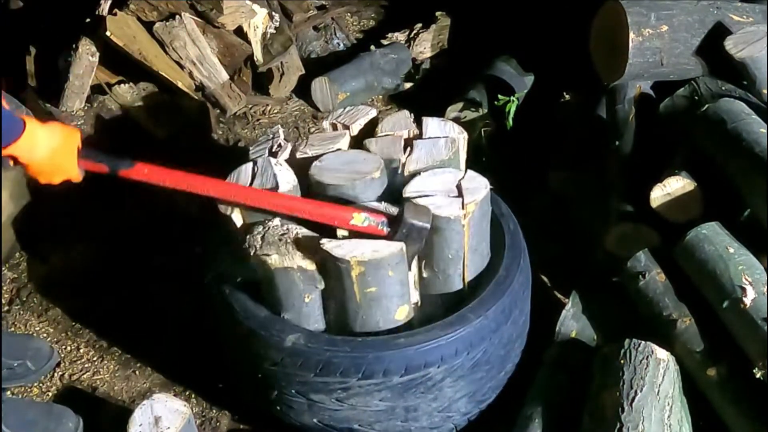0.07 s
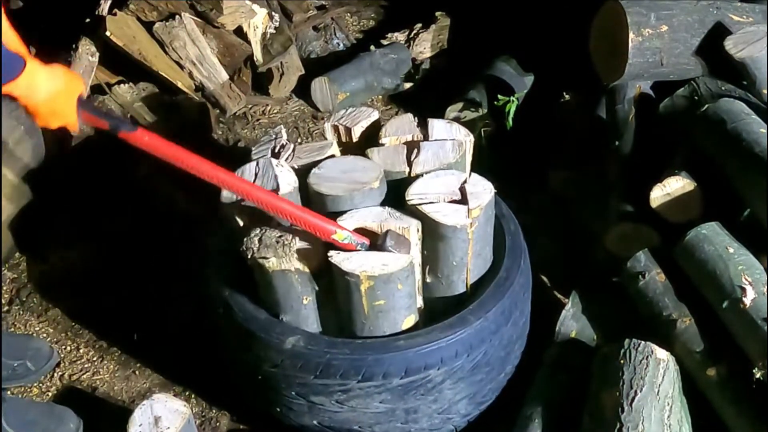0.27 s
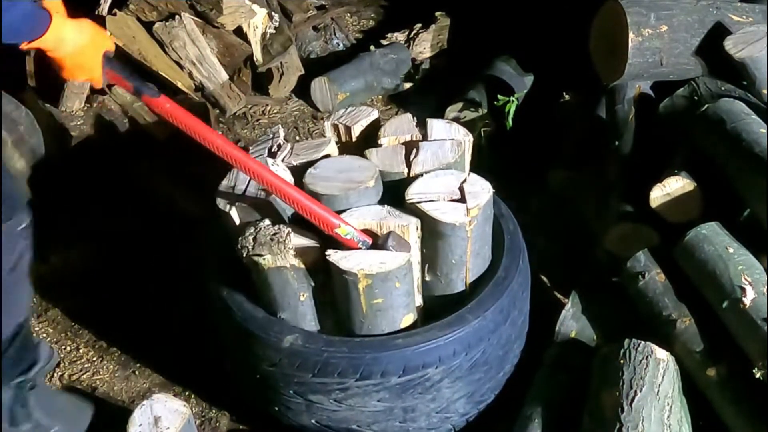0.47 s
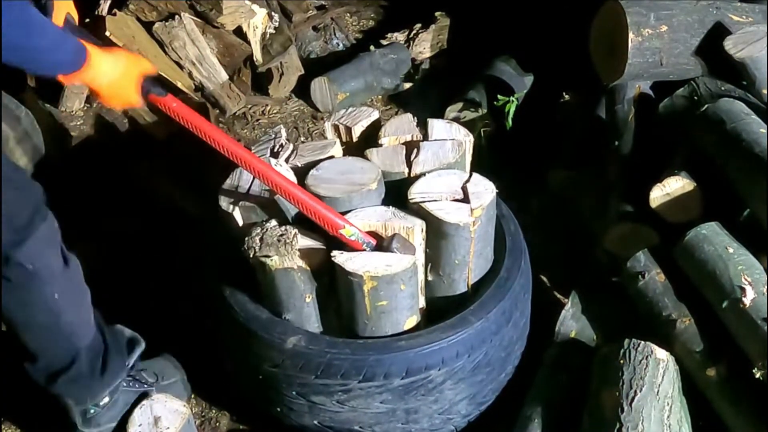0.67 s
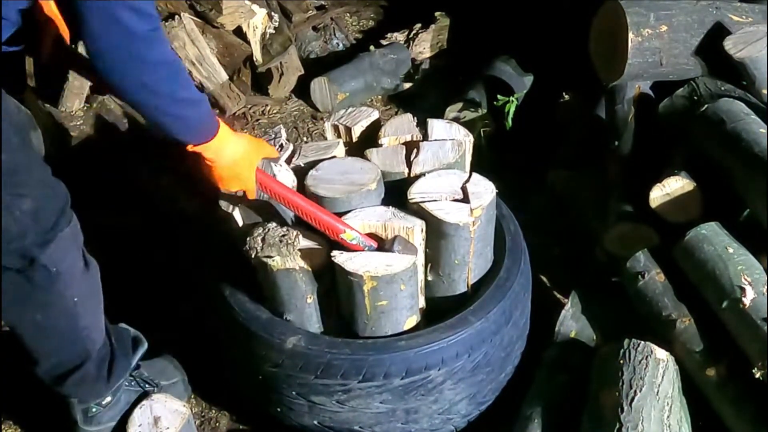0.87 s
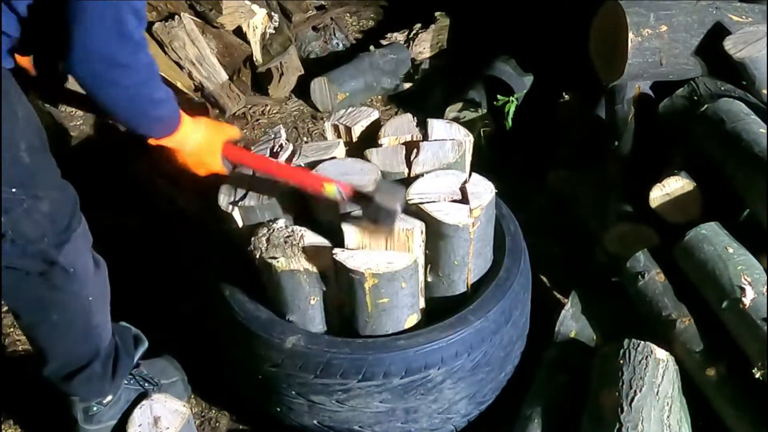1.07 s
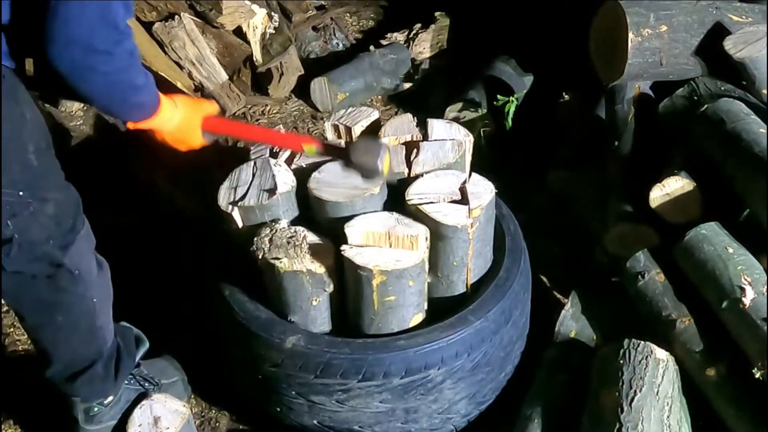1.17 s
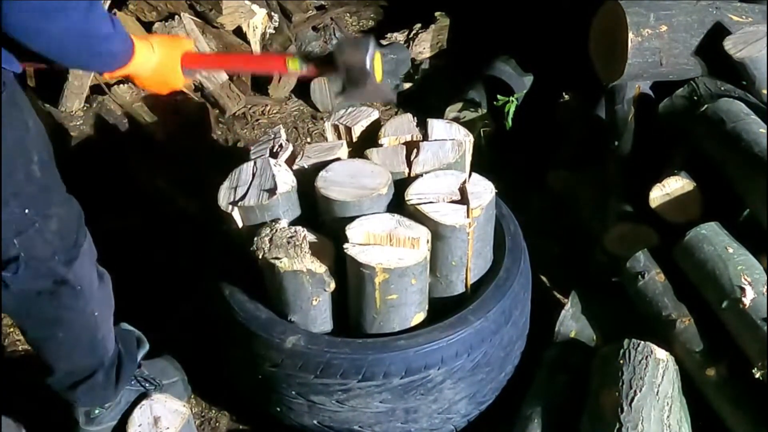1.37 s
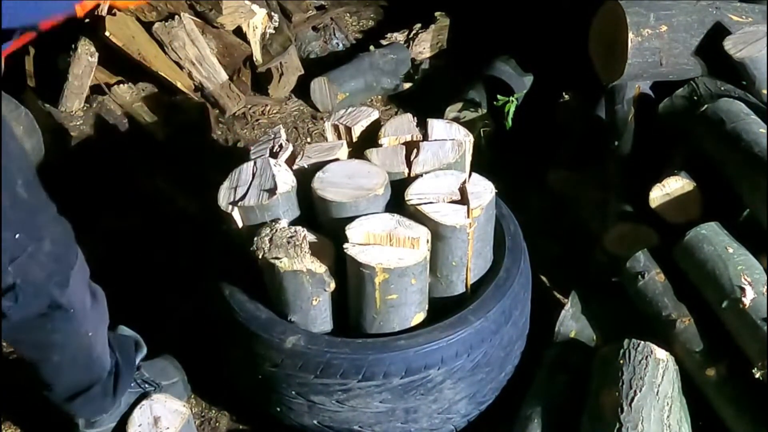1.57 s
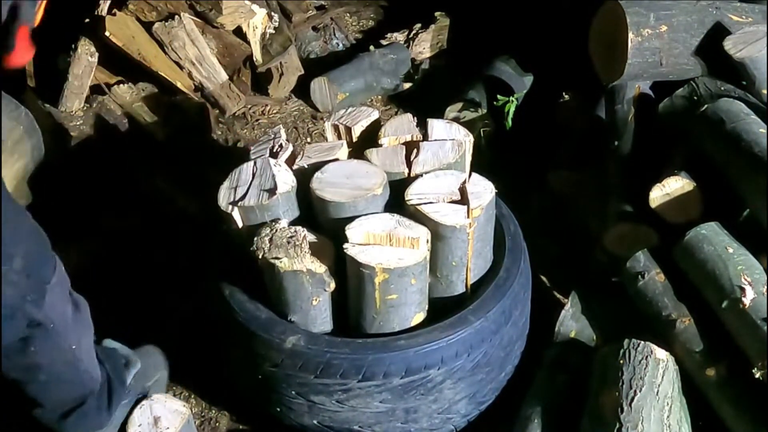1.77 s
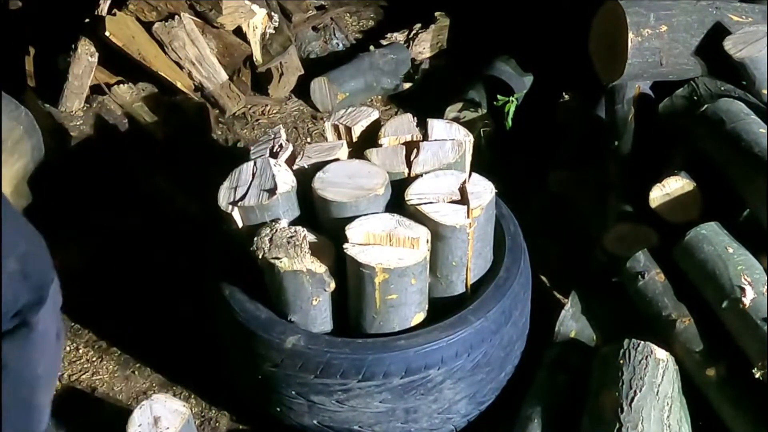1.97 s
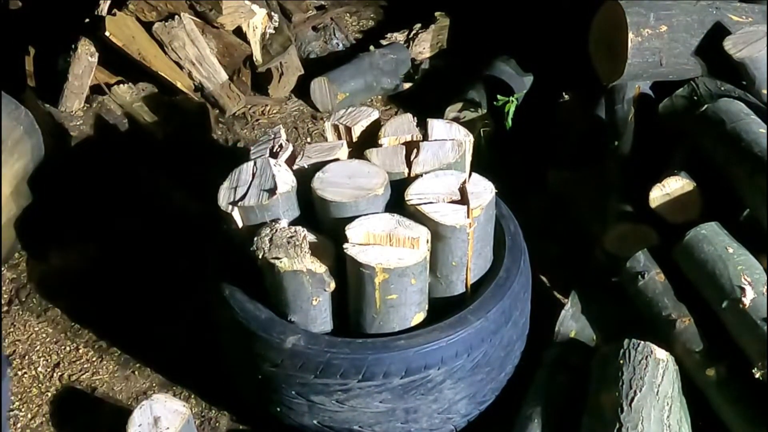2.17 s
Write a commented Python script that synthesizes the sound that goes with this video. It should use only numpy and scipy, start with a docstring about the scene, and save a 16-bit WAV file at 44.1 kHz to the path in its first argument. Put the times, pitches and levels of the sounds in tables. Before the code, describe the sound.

A heavy maul cracks into a log once, with a low thud and small wooden knocks after

```python
"""A heavy maul splits a log standing in a tyre, over a low rumble and distant wash of filtered noise.
First a short wavering tone swells; then the blow rings the log's modes, fibres tear in a burst of noise,
and tyre and ground thud. Afterwards logs knock as decaying modes, splinters tick, the steel head drags
on the wood in grains of noise and pings as it is worked loose. Clothes rustle as treble noise,
most strongly near the end, where a narrower rubbing band joins."""
import sys
import numpy as np
from scipy import signal
from scipy.fft import rfft, irfft
from scipy.io import wavfile
from scipy.ndimage import uniform_filter1d

SR = 44100
rng = np.random.default_rng(int(sys.argv[2]) if len(sys.argv) > 2 else 0)


def int16_out(signal):
    """Quantize to a 16-bit WAV file."""
    q = np.round(np.clip(np.atleast_2d(signal).T, -1, 1) * 32767)
    wavfile.write(sys.argv[1], SR, q.astype(np.int16))


def invert_db(x):
    """Field ratio 10**(x/20) for x, a level in decibels (scalar or array-like)."""
    u = np.asarray(x, float) / 20
    return 10 ** u


N = 97328  # length in samples

# Spectra are relative: each noise is brought to unit rms before its level is applied.
# low rumble of the yard: spectrum [f/Hz, level/dB per Hz]; course [t/s, level/dB]
RUMBLE_SPECTRUM = [(8.8, -68), (15, -21.5), (38, 1.5), (54, -0.5), (64, -5), (81, -6), (119, -23),
                   (160, -20.5), (210, -27), (350, -120)]
RUMBLE_COURSE = [(0.0, -45), (0.07, -50), (0.13, -33), (0.28, -45), (0.45, -44), (0.58, -52), (0.8, -44),
                 (0.9, -54), (1.08, -45), (1.25, -48), (1.6, -42.5), (1.68, -37), (1.85, -47), (2.2, -41)]
# distant wash: spectrum [f/Hz, level/dB per Hz]; course [t/s, level/dB]
WASH_SPECTRUM = [(53, -40.5), (90, -2.5), (112, -33.5), (138, -3.5), (288, -4.5), (424, -9.5), (574, -10.5),
                 (1510, -15.5), (2000, -20.5), (15500, -65.5)]
WASH_COURSE = [(0.0, -46.5), (0.65, -59.5), (2.2, -47)]
# rustling clothes: spectrum [f/Hz, level/dB per Hz]; course [t/s, level/dB]
RUSTLE_SPECTRUM = [(880, -37), (1500, -29.5), (2130, -3), (2920, -3.5), (4440, -8.5), (7300, -7.5),
                   (9600, -17.5), (11000, -24), (13900, -49), (15500, -58.5)]
RUSTLE_COURSE = [(0, -66.5), (.15, -57.5), (.28, -71.5), (.345, -79), (.38, -59.5), (.44, -71.5),
                 (.65, -76.5), (.77, -74.5), (.83, -65), (.9, -71.5), (1.0, -65.5), (1.12, -69.5),
                 (1.18, -64), (1.27, -68), (1.32, -69.5), (1.4, -67), (1.6, -74), (1.72, -63.5),
                 (1.86, -69), (1.99, -62), (2.07, -53.5), (2.17, -54), (2.2, -66)]
# fuzzy band in the last rustle: spectrum [f/Hz, level/dB per Hz]; course [t/s, level/dB]
RUB_SPECTRUM = [(1300, -37), (1750, -12), (2000, -8), (2300, -15), (3200, -41)]
RUB_COURSE = [(2.0, -78), (2.06, -51), (2.13, -53), (2.18, -81)]
# likeness of the two channels of each noise [f/Hz, correlation]
CHANNEL_LIKENESS = [(60, 1.0), (130, 0.93), (290, 0.99), (640, 0.87), (1410, 0.73), (3100, 0.64), (6820, 1),
                    (15000, 0.58)]
# lean of blow, settling and swell [f/Hz, left minus right level/dB]
NEAR_LEAN = [(60, -3.5), (240, -1.0), (950, -4.5), (3770, -1), (15000, -0.5)]
# tyre and ground: spectrum [f/Hz, level/dB per Hz]; course [t/s, level/dB]
THUD_SPECTRUM = [(20, -24), (45, -12), (90, -17), (140, -5), (190, 2), (260, -12), (400, -16), (800, -25.5),
                 (1500, -35.5), (3500, -70)]
THUD_COURSE = [(.11, -33), (.14, -29), (.17, -33), (.19, -36.5), (.215, -34), (.25, -39.5), (.27, -57),
               (.29, -49.5)]
# head dragging on wood: strokes [start t/s, length t/s, relative level/dB]
SCRAPE_STROKES = [(0.331, 0.025, -51), (0.393, 0.024, -53.5), (0.784, 0.049, -55.5), (1.15, 0.05, -51),
                  (1.184, 0.038, -45.5), (1.215, 0.09, -48.5)]
# dragging noise: spectrum [f/Hz, level/dB per Hz]
SCRAPE_SPECTRUM = [(150, -30), (250, -2), (402, 0), (712, 0), (1000, 1), (1560, -7), (2370, -4),
                   (4010, -21), (7440, -33), (12000, -52), (15600, -81), (22000, -120)]
# steel head pinging [t/s, peak level/dB, f/Hz, t60 of the mode/s]
STEEL_PINGS = [(.393, -47.5, 7300, 0.03), (.393, -59, 5480, 0.028), (0.392, -58.5, 6200, 0.027),
               (1.049, -55, 1042, 0.099), (1.2, -42, 717, 0.122), (1.161, -50, 2123, 0.09),
               (1.174, -46.5, 2250, .03), (1.175, -57, 3700, .05), (1.175, -58, 6200, .02),
               (1.204, -48, 2400, .03), (1.239, -44, 1010, .05), (1.228, -40, 980, 0.034),
               (1.226, -46.5, 2010, 0.1), (1.249, -56, 7260, 0.11), (1.249, -44, 2340, 0.042),
               (1.251, -41, 1006, 0.045), (1.275, -40.5, 996, 0.068), (1.276, -57, 2290, 0.046),
               (1.443, -50.5, 2453, 0.034), (0.395, -46.5, 1000, 0.079)]
# dry ticks of splinters [t/s, main partial level/dB, main partial f/Hz]
SPLINTER_TICKS = [(0.0655, -40, 1200), (0.2615, -52, 2400), (0.3645, -48, 5100), (0.423, -47, 3000),
                  (0.4954, -49.5, 4560), (0.7971, -48, 1950), (1.011, -55, 3300), (1.2012, -48, 2400),
                  (1.4431, -50, 2370), (1.2915, -54, 5800), (1.3562, -57, 4750), (1.444, -53, 4800),
                  (1.4749, -57, 3900), (1.493, -57, 6500), (1.513, -57, 4200)]
# logs knocking [t/s, peak level/dB, brightness/dB per octave before a common darkening]
LOG_KNOCKS = [(0.203, -41, 14.5), (0.226, -31, -9), (0.348, -40.5, -16), (0.354, -34.5, 1),
              (0.398, -33, -3), (0.422, -31.5, -5.5), (0.427, -35.5, 1), (0.493, -42, -4.5),
              (1.193, -40, 8), (1.198, -36, -3), (1.224, -41, 17.5), (1.277, -42.5, -4.5),
              (1.442, -39.5, 10.5)]
# modes of the log [f/Hz before detuning, relative level/dB, t60/s]
LOG_MODES = [(177, -19, 0.07), (206, -17, 0.09), (307, -16.5, 0.13), (480, 0, 0.025), (600, 0, 0.03),
             (680, 1, 0.016), (1017, 10.5, 0.01), (1450, -12.5, 0.038), (1836, -9, 0.026),
             (2705, -18.5, 0.022)]
# course of the tone into the blow [t/s, level/dB]
SWELL_COURSE = [(.06, -80.5), (.075, -45), (.09, -21.5), (.098, -18), (.105, -13.5), (.1078, -17),
                (.109, -20), (.114, -75.5)]
# the tyre booms as the logs bounce in it [t/s, level/dB, f/Hz]
TYRE_BOOMS = [(.1131, -9, 195), (.138, -21, 200), (.209, -25, 215), (.232, -30, 180), (.424, -33, 195),
              (1.197, -39, 210)]
# tearing fibres: spectrum [f/Hz, level/dB per Hz]
CRACK_SPECTRUM = [(650, -11.5), (1100, -18.5), (2070, -19.5), (2390, -20), (2820, -27), (6760, -33),
                  (7550, -28), (10400, -41), (15500, -74)]

BLOW_S = .1079
ROUGHNESS_DB = 1.5  # patches and flicker of the contact noises
RISE_CYCLES = 0.48  # soft start of log and tyre modes


def evened(x):
    """Normalisation: scales a signal to unit rms."""
    return x / np.sqrt(np.mean(x ** 2) + 1e-20)


def read(points, hz):
    """Interpolation of a spectral table along a logarithmic frequency axis."""
    f, value = np.transpose(points)
    return np.interp(np.log(hz + 1), np.log(f + 1), value)


def curve(points):
    """Envelope: a course of levels joined linearly in dB, returned as amplitude."""
    s, db = np.transpose(points)
    return invert_db(np.interp(np.arange(N) / SR, s, db))


def add(mix, s, sound):
    """Superposition: adds a sound into the mix from time s."""
    part = mix[round(s * SR):][:len(sound)]
    part += sound[:len(part)]


def noise(spectrum, patchy_db, flicker_db, size=512):
    """Random short-time spectra, shaped and partly correlated between two channels, give coloured noise."""
    hop, hz = size // 4, np.fft.rfftfreq(size, 1 / SR)
    a, b, c, d, patches = rng.standard_normal((N // hop + 5, len(hz), 5)).T
    # flicker moves all frequencies together; patches are local in frequency and time
    flicker = evened(uniform_filter1d(patches[0], size=3))
    patches = uniform_filter1d(patches, size=8, axis=0)
    patches = evened(uniform_filter1d(patches, size=8, axis=1))
    same = np.clip(read(CHANNEL_LIKENESS, hz), -1, 1)[:, None]
    left = a + 1j * b
    right = same * left + np.sqrt(1 - same ** 2) * (c + 1j * d)
    level_db = read(spectrum, hz)[:, None] + patchy_db * patches + flicker_db * flicker
    frames = np.array([left, right]) * invert_db(level_db)
    return evened(signal.istft(frames, nperseg=size, noverlap=size - hop)[1][:, :N])


def ring(hz, t60, rise_s):
    """A damped resonance: one sine mode with exponential decay and a linear soft start."""
    t = np.arange(0, .2, 1 / SR)
    return np.minimum(t / rise_s, 1) * invert_db(-60 * t / t60) * np.sin(2 * np.pi * hz * t)


def log_sound(tilt_db, detune):
    """Modal superposition: a struck log's modes, tilted in dB per octave about 500 Hz; peak 1."""
    out = 0
    for (hz, db, t60), k in zip(LOG_MODES, detune):
        out = out + invert_db(db + tilt_db * np.log2(hz / 500)) * ring(hz * k, t60, RISE_CYCLES / hz)
    return out / abs(out).max()


def rumble():
    """Stationary low-frequency noise, patchy in time and frequency, under a slow level envelope."""
    return curve(RUMBLE_COURSE) * noise(RUMBLE_SPECTRUM, patchy_db=2.0, flicker_db=0.0, size=4096)


def wash():
    """Broadband noise weighted to the lower frequencies, with a slight common flicker."""
    return curve(WASH_COURSE) * noise(WASH_SPECTRUM, patchy_db=0.0, flicker_db=0.63, size=1024)


def rustle():
    """Friction of cloth: flickering treble noise, with a narrower rubbing band near the end."""
    cloth = curve(RUSTLE_COURSE) * noise(RUSTLE_SPECTRUM, patchy_db=0.0, flicker_db=1.87, size=256)
    rub = curve(RUB_COURSE) * noise(RUB_SPECTRUM, ROUGHNESS_DB, flicker_db=3.0, size=256)
    return cloth + rub


def yard(x):
    """Reflection: sparse decaying echoes off woodpile and ground, different in each channel."""
    t = np.arange(SR // 5) / SR
    signs = rng.choice([-1., 1.], (2, len(t)))
    present = rng.random((2, len(t))) < .04
    taps = signs * present * invert_db(-60 * t / .12) * (t > .003)  # t60 .12 s, first echo after 3 ms
    return signal.fftconvolve(x[None], taps / np.linalg.norm(taps[0]), axes=1)[:, :N]


def scraping():
    """Stick-slip friction: noise chopped into random grains of a few milliseconds under each drag."""
    grains_per_s, grain_decay_s, grain_spread_db = 1300, 0.002, 4
    t, stroke = np.arange(N) / SR, np.zeros(N)
    for s, length, db in SCRAPE_STROKES:
        stroke += invert_db(db) * np.sin(np.pi * np.clip((t - s) / length, 0, 1)) ** 2
    strength = invert_db(grain_spread_db * np.minimum(rng.exponential(1, N), 3))
    hits = (rng.random(N) < grains_per_s / SR) * strength
    grains = evened(signal.lfilter([1], [1, -np.exp(-1 / (grain_decay_s * SR))], hits))
    return stroke * grains * noise(SCRAPE_SPECTRUM, ROUGHNESS_DB, ROUGHNESS_DB, size=256)[0]


def pings():
    """Forced resonance: a short decaying noise chatter excites single modes of the steel head."""
    out = np.zeros(N)
    for s, db, hz, t60 in STEEL_PINGS:
        drive = rng.standard_normal(1200) * invert_db(-60 * np.arange(1200) / SR / 0.03)  # t60 .03 s
        ping = np.convolve(ring(hz, t60, .0005), drive)
        add(out, s, invert_db(db) * ping / abs(ping).max())
    return out


def ticks():
    """Strongly damped modes: each splinter sounds a main partial and six weaker ones scattered about it."""
    t60 = 0.011
    out = np.zeros(N)
    for s, db, hz in SPLINTER_TICKS:
        partials = sum(ring(hz * q, t60 * 0.96, 0.000532) for q in rng.uniform(0.7, 1.35, 6))
        add(out, s, invert_db(db) * (ring(hz, t60, .0010) + .45 * partials))
    return out


def knocks():
    """Impact of log on log: the log modes, detuned and tilted anew for each knock."""
    out = np.zeros(N)
    for s, db, tilt_db in LOG_KNOCKS:
        detune = rng.uniform(.9, 1.1, len(LOG_MODES))
        add(out, s, invert_db(db) * log_sound(tilt_db - 5.5, detune))  # common darkening 5.5 dB per octave
    return out


def thud():
    """Ground-borne vibration: low noise of tyre and ground rises just after the blow and fades."""
    t = np.arange(N) / SR
    rise = np.clip((t - BLOW_S) / 0.0081, 0, 1)
    fall = np.clip((THUD_COURSE[-1][0] - t) / 0.017, 0, 1)
    return rise * fall * curve(THUD_COURSE) * noise(THUD_SPECTRUM, ROUGHNESS_DB, ROUGHNESS_DB, size=2048)


def swell():
    """Random modulation: a wavering tone, a faint high partner and fuzz grow and fall away at the blow."""
    low_hz, high_hz = 895.3, 7940
    high_db, fuzz_db = -49, -19  # relative to the low tone
    waver_db, waver_s = -15, .002  # depth and smoothing time
    t = np.arange(N) / SR - BLOW_S
    waver = uniform_filter1d(rng.standard_normal((2, N)), round(waver_s * SR))
    size, turn = invert_db(waver_db) * evened(waver)  # amplitude and phase (radians)
    low = (1 + size) * np.sin(2 * np.pi * low_hz * t + turn)
    high = invert_db(high_db) * np.sin(2 * np.pi * high_hz * t)
    fuzz = invert_db(fuzz_db) * noise(CRACK_SPECTRUM, ROUGHNESS_DB, ROUGHNESS_DB, size=256)
    return curve(SWELL_COURSE) * (np.sqrt(2) * (low + high) + fuzz)


def tyre():
    """Resonance of the tyre: each bounce of the logs sounds one low damped mode."""
    out = np.zeros(N)
    for s, db, hz in TYRE_BOOMS:
        add(out, s, -invert_db(db) * ring(hz, .07, RISE_CYCLES / hz))  # t60 .07 s
    return out


def tearing():
    """Fracture: a noise burst of tearing fibres, the sum of a fast and a slow decay, thins into splinters."""
    crack_db, crack_t60, splinter_db, splinter_t60 = -12.5, 0.022, -33, 0.14
    t = np.arange(N) / SR - BLOW_S + 0.0014  # begins 1.4 ms before the log modes
    rise = np.clip(t / 0.00092, 0, 1)
    crack = invert_db(crack_db - 60 * abs(t) / crack_t60)
    splinters = invert_db(splinter_db - 60 * abs(t) / splinter_t60)
    return rise * (crack + splinters) * noise(CRACK_SPECTRUM, ROUGHNESS_DB, ROUGHNESS_DB, size=128)[0]


def blow():
    """Impact excitation: the maul rings all the log's modes at once, with tyre and tearing fibres."""
    out = tyre() + tearing()
    add(out, BLOW_S, invert_db(-0.3) * log_sound(0, np.ones(len(LOG_MODES))))
    return out


def scene():
    """Superposition of near sources, their reflections, the thud and the air of the yard."""
    near = blow() + knocks() + ticks() + pings() + scraping()
    lean = invert_db(np.outer([.5, -.5], read(NEAR_LEAN, np.fft.rfftfreq(N, 1 / SR))))
    placed = irfft(rfft(near + swell()) * lean, N)
    air = rumble() + wash() + rustle()
    mix = placed + invert_db(-19) * yard(near) + thud() + air
    # first-order delay of the left channel by 12 microseconds
    left_lag_s = .000012
    return mix - np.array([[left_lag_s * SR], [0]]) * np.gradient(mix, axis=1)


def low_pass(x):
    """Removes everything above the highest recorded frequency."""
    return signal.sosfilt(signal.butter(12, 15670, fs=SR, output="sos"), x)


def record(dry):
    """Saturation and band limitation: a hard ceiling, then a linear-phase low-pass at 15.6 kHz."""
    limited = np.clip(dry, -1, 1)
    padded = np.pad(limited, [(0, 0), (127, 127)], "reflect")
    smooth = signal.oaconvolve(padded, signal.firwin(255, 15600, fs=SR)[None], "valid", axes=1)
    return low_pass(smooth)


dry = scene()
out = record(dry)
int16_out(out)
```